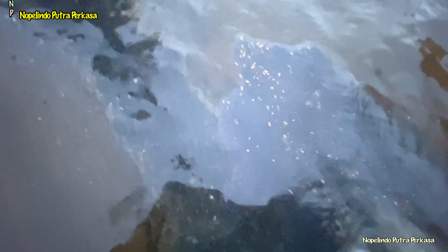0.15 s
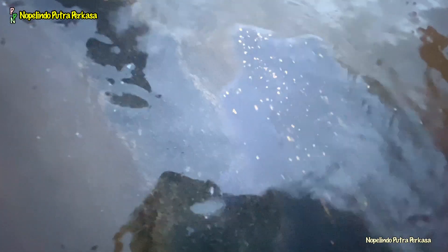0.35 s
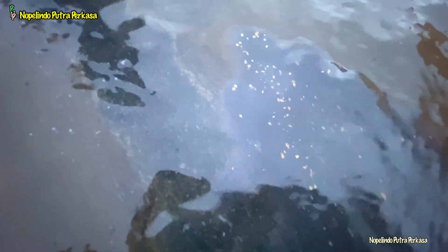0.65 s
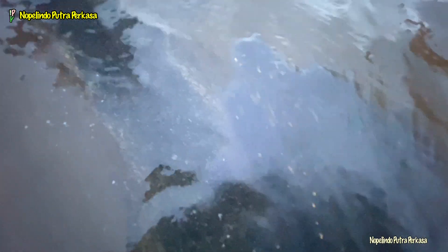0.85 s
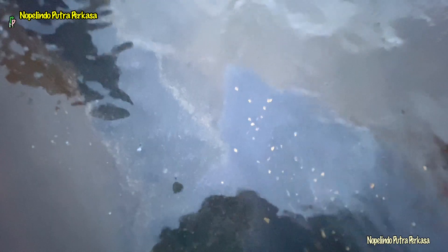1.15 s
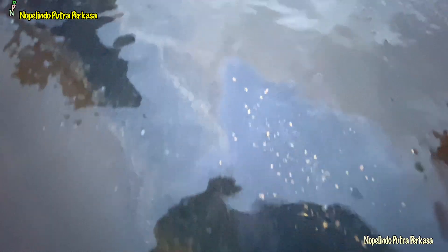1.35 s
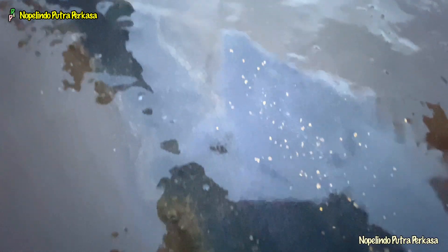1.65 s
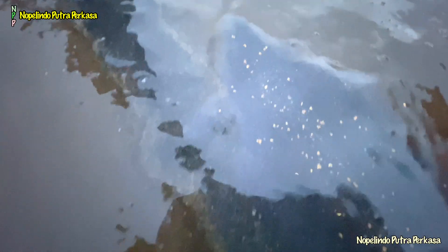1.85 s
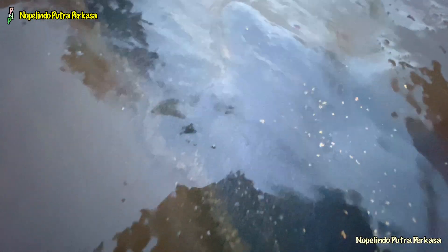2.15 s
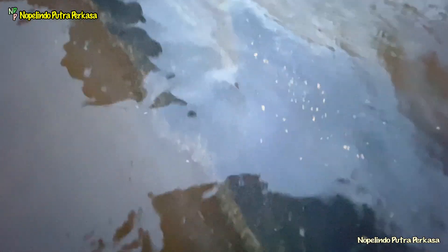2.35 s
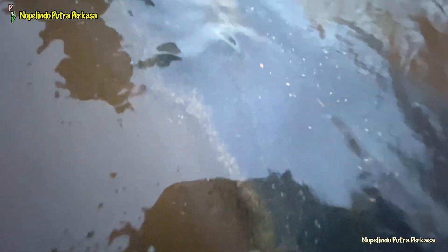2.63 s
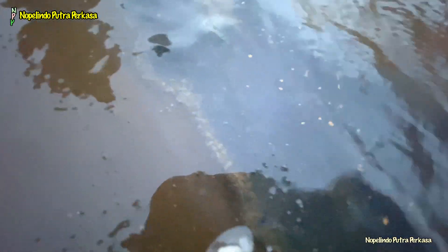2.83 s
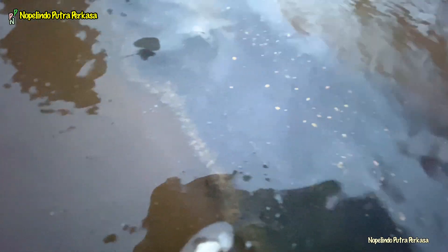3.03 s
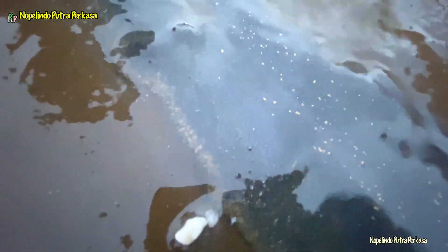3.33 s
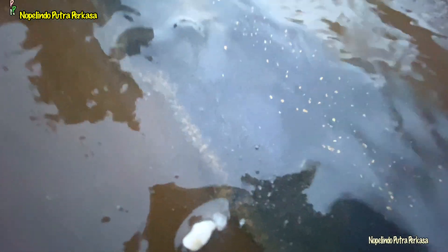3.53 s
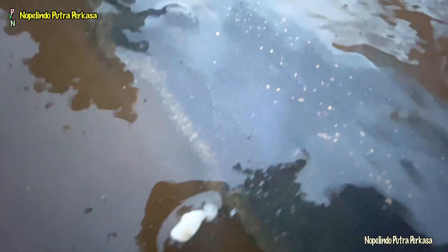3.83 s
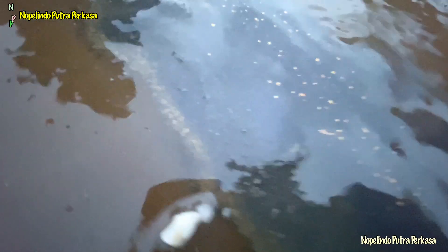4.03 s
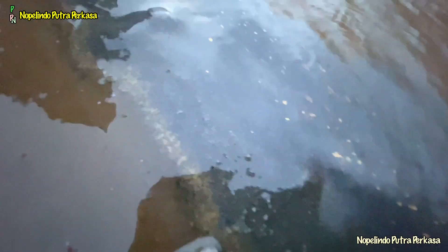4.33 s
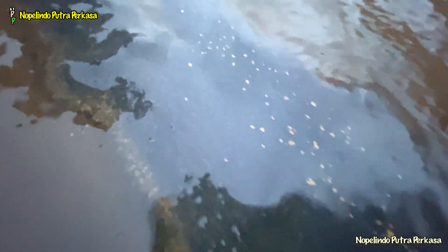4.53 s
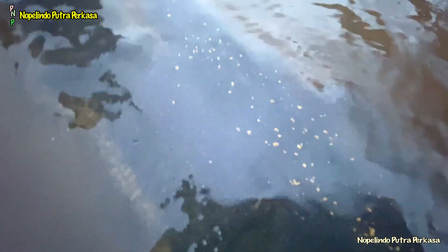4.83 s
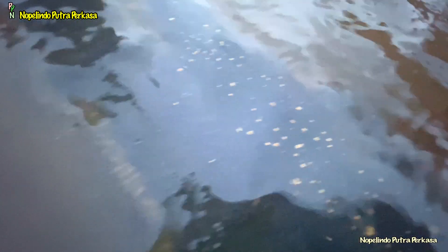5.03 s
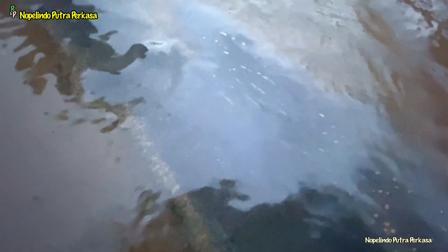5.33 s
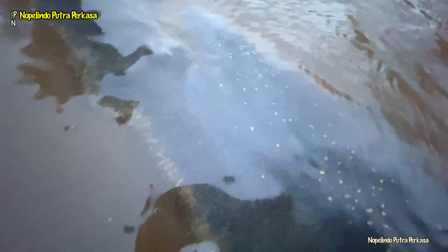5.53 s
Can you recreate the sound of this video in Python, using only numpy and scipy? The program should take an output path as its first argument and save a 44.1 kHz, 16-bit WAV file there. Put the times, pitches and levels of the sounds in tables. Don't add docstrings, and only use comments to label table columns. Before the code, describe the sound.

Quiet close sloshing, bubbles and tiny ticks in a pan of water give way to fast, deep, overloaded thumps on the pan.

```python
import sys
import numpy as np
from scipy import signal
from scipy.io import wavfile

SR = 44100
rng = np.random.default_rng(int(sys.argv[2]) if len(sys.argv) > 2 else 0)


def transcribe(u):
    v = np.clip(np.atleast_2d(u).T, -1, 1)
    q = np.round(v * 32767).astype(np.int16)
    wavfile.write(sys.argv[1], SR, q)


def volts_from_db(level):
    exponent = np.asarray(level, float) / 20
    return 10 ** exponent


N = 250047

# t/s, boom peak level/dB, then thud, wall and rim levels/dB relative to the boom
KNOCKS = [(3.151, -12.5, -21.5, -26.5, -30.5), (3.389, -3, -21.5, -27.5, -27),
          (3.573, -9, -16.5, -21.5, -24), (3.757, -7.5, -21.5, -18, -23.5),
          (3.9539, -1.13, -24.5, -35, -17.5), (4.193, -4, -17.5, -26, -16), (4.417, -1.26, -16, -26, -14),
          (4.653, -1.5, -18.5, -27, -22), (4.901, -3, -18.5, -25, -12), (4.965, -5.5, -23.5, -23, -8),
          (5.116, -20, -7, -11.5, -12), (5.155, -1, -21, -26.5, -16.5), (5.361, -33, -24, -47, -13),
          (5.437, -28, -11, -15.5, -15.5)]


def rms_one(x):
    return x / np.sqrt(np.mean(x ** 2) + 1e-20)


def at_hz(points, hz):
    table_hz, values = np.array(points).T
    return np.interp(np.log(hz), np.log(table_hz), values)


def sides(pan_db):
    return volts_from_db([[pan_db / 2], [-pan_db / 2]])


def add(out, s, sound):
    i = max(round(s * SR), 0)
    out[:, i:i + sound.shape[1]] += sound[:, :N - i]


def drift(rate):
    r = np.exp(-80 * np.pi * rate / SR)
    slow = signal.lfilter([1], [1, -2 * r, r * r], rng.standard_normal(N // 40 + 2002))[2000:]
    return np.interp(np.arange(N) / 40, np.arange(len(slow)), rms_one(slow))


def wash(spectrum, patchy_db, per_s, spread_db, grain_share, lag_ms, count=3):
    # f/Hz, likeness [-1 to 1]
    likeness = [(60, -0.82), (180, -0.42), (550, -0.15), (1650, -0.12), (4970, 0.79), (15000, -0.73)]
    heard = [hz for hz, db in spectrum if db > -60]
    low, high = heard[0], min(heard[-1], .45 * SR)
    bounds = np.geomspace(low, high, int(count * np.log2(high / low)) + 2)
    clumps = per_s * volts_from_db(5.6 * drift(18)) / SR
    share = np.clip(grain_share, 0, 1)
    white = rng.standard_normal((2, 2, N))
    grains = (rng.random((2, 1, N)) < clumps) * volts_from_db(spread_db * np.minimum(white ** 2, 8))
    white = np.sqrt(1 - share) * white + np.sqrt(share) * rms_one(grains * np.sign(white))
    out, together = 0, drift(19)
    for k, (a, b) in enumerate(zip(bounds, bounds[1:])):
        band = signal.butter(2, [a, b], "band", fs=SR, output="sos")
        mid, side = signal.sosfilt(band, white[k % 2])
        centre = np.sqrt(a * b)
        alike = np.clip(at_hz(likeness, centre), -1, 1)
        gain = volts_from_db(at_hz(spectrum, centre) + patchy_db * (0.91 * together + drift(4.4)))
        out = out + gain * (np.sqrt(1 + alike) * mid + np.sqrt(1 - alike) * side * [[1], [-1]])
    out[1] = np.roll(out[1], round(lag_ms * SR / 1000))
    return rms_one(out)


def hiss():
    white = rng.standard_normal((2, N))
    low = signal.butter(4, [900, 6500], "band", fs=SR, output="sos")
    high = signal.butter(3, [8000, 11000], "band", fs=SR, output="sos")
    low_hiss = rms_one(signal.sosfilt(low, white))
    high_hiss = rms_one(signal.sosfilt(high, white))
    return volts_from_db(-76) * low_hiss + volts_from_db(-93.5) * high_hiss


def breeze():
    # f/Hz, level/dB per Hz
    spectrum = [(15, -32.5), (25, 14), (86, -1.5), (182, -5.5), (227, -4), (400, -18), (520, -1.5),
                (880, -120)]
    # t/s, half width/s, level over the breeze/dB
    puffs = [
        (1.3, 0.16, 9.5),
        (1.501, .1, 2),
        (2.33, 0.038, 14),
        (2.72, 0.085, 11),
        (5.49, 0.098, 18),
        (5.63, 0.039, 5.5),
    ]
    air = wash(spectrum, patchy_db=0.5, per_s=9.1, spread_db=-1, grain_share=0.2, lag_ms=0, count=2)
    air = air * sides(-2.2)
    t = np.arange(N) / SR
    puffs_db = sum(db * np.exp(-((t - s) / half_s) ** 2) for s, half_s, db in puffs)
    rumble = signal.sosfilt(signal.butter(2, 150, fs=SR, output="sos"), air)
    return air + (volts_from_db(puffs_db) - 1) * rumble


def bird():
    # t/s, f/Hz, level/dB
    coos = [
        [(0.17, 430, -78), (0.212, 499.5, -76.5), (0.36, 533, -73)],
        [(0.39, 469, -74), (0.44, 435, -75), (0.47, 487, -73)],
        [(1.52, 447, -98), (1.534, 520, -64), (1.63, 526, -82)],
        [(1.65, 494, -69), (1.708, 543, -66.5), (1.74, 545, -81)],
        [(2.59, 592, -77), (2.63, 622, -62), (2.68, 820, -88)],
        [(1.76, 525, -73), (1.8, 498, -57), (1.84, 700, -73)],
    ]
    out, t = np.zeros(N), np.arange(N) / SR
    for call in coos:
        s, hz, db = np.transpose(call)
        gate = np.interp(t, [s[0] - .015, s[0], s[-1], s[-1] + 0.0089], [0, 1, 1, 0])
        waver_db = 2.5 * drift(62)
        level = gate * volts_from_db(np.interp(t, s, db) + 6 + waver_db)
        out += level * np.sin(2 * np.pi * np.cumsum(np.interp(t, s, hz)) / SR)
    return out


def flow():
    # level/dB of breeze, gurgle, trickle, fizz
    calm_db = [-59, -72.5, -79.5, -82]
    # t of crest/s, rise/s, fall/s, gurgle level/dB, thinness [0 deep - 1 shallow]
    surges = [(0.177, 0.38, 0.41, -70.5, 0.39), (0.532, .02, 0.028, -56, 0.31),
              (0.703, 0.08, 0.16, -75.5, 1), (1.125, 0.045, .2, -46, 0.21),
              (1.342, .05, 0.061, -61.5, 0.44), (1.451, 0.13, 0.17, -61.5, 0.82),
              (1.585, 0.2, 0.029, -58.5, 0.89), (1.644, 0.03, .19, -59.5, 0.63),
              (1.781, 0.21, 0.03, -72, 0.87), (2.32, 0.13, 0.34, -74, 0.79),
              (2.548, 0.023, 0.092, -73, 0.86), (2.698, 0.2, 0.049, -65.5, 0.04),
              (2.8, 0.041, 0.13, -85, 0.94), (3.03, 0.024, 0.24, -50, .35),
              (3.623, 0.36, 0.45, -70.5, 0.94), (4.333, 0.073, 0.19, -43.5, 0.17),
              (4.843, 0.061, 0.067, -55, 0.73), (4.999, 0.014, 0.11, -61.5, 1),
              (5.28, 0.088, 0.039, -49.5, 0.17)]
    deep_db, shallow_db = [-14, -31.5], [9, 1]
    rise_db, fall_db, edge_s = 10.5, 9, 0.036
    shake_db, shake_t60_s = np.c_[[-33.5, -36, -57.5, -70]], np.c_[[1, 0.73, 0.77, 0.63]]
    t = np.arange(N // 40 + 2) * 40 / SR
    power = volts_from_db(np.add.outer(calm_db, 0 * t)) ** 2
    for s, rise, fall, db, thin in surges:
        corners = np.cumsum([s - rise - edge_s, edge_s, rise, fall, edge_s])
        swell = np.interp(t, corners, [-60, -rise_db, 0, -fall_db, -60])
        upper_db = np.add(deep_db, thin * np.subtract(shallow_db, deep_db))
        power[1:] += volts_from_db(db + np.add.outer([0, *upper_db], swell)) ** 2
    for s, db, *_ in KNOCKS:
        age = np.maximum(t - s, 0) / shake_t60_s
        power += (t > s) * volts_from_db(db + shake_db - 60 * age) ** 2
    return [np.interp(np.arange(N) / SR, t, np.sqrt(p)) for p in power]


def gurgle():
    # f/Hz, level/dB per Hz
    spectrum = [(150, -65), (250, -18.5), (306, -10), (562, -9), (787, -10), (921, -8.5), (1040, -14.5),
                (1500, -20), (1950, -26.5), (3300, -120)]
    return wash(spectrum, patchy_db=3.5, per_s=200, spread_db=1.5, grain_share=.5, lag_ms=0.46)


def trickle():
    # f/Hz, level/dB per Hz
    spectrum = [(700, -35.5), (1000, -15.5), (1400, -9), (2000, -4), (2800, -11.5), (3700, -15),
                (4600, -7.5), (7000, -49)]
    return wash(spectrum, patchy_db=3.2, per_s=230, spread_db=1, grain_share=0.15, lag_ms=.5)


def fizz():
    # f/Hz, level/dB per Hz
    spectrum = [(2650, -16.5), (4500, 9.5), (5200, 2.5), (5700, 4.5), (6630, 13.5), (7360, -32.5),
                (7670, -63.5), (8030, 12), (8550, 18), (13000, -9), (15500, -31)]
    spray = wash(spectrum, patchy_db=3.5, per_s=500, spread_db=2.5, grain_share=0.52, lag_ms=.3, count=5)
    return spray * sides(-12)


def wisps():
    # t/s, length/s, start f/Hz, end f/Hz, level/dB
    films = [
        (0.475, 0.17, 3030, 3600, 8.5),
        (1.671, 0.12, 3410, 4060, 16),
        (2.431, 0.22, 3080, 3760, 4),
        (3.267, 0.076, 5950, 6000, 3),
        (4.071, 0.18, 3050, 3300, 12),
        (4.1, 0.12, 3800, 4100, 7),
    ]
    out, flutter, patches = np.zeros((2, N)), drift(130), drift(17)
    for s, length, start_hz, end_hz, db in films:
        t, i = np.linspace(0, 1, round(length * SR)), round(s * SR)
        span = slice(i, i + len(t))
        hz = start_hz + (end_hz - start_hz) * t + 150 * flutter[span]
        whistle = np.sin(np.pi * t) * np.sin(2 * np.pi * np.cumsum(hz) / SR)
        add(out, s, volts_from_db(db - 78 + 7 * patches[span]) * whistle * sides(0))
    return out


def splashes(low, high):
    # t/s, peak level/dB, low part relative level/dB, length/s
    heaps = [(0.527, -56, 1, 0.051), (1.429, -62.5, 16, 0.029), (1.625, -40, -3, 0.058),
             (2.305, -80, -15, 0.038), (2.57, -68, -9, 0.016), (2.692, -38, -23, 0.03),
             (3.42, -39.5, -13, 0.064), (4.183, -48.5, 22, 0.061), (4.472, -54, -4, 0.017),
             (4.74, -28.5, -28, 0.039), (4.933, -30.5, 12, 0.011), (5.031, -42, 24, 0.0075),
             (5.078, -70, 0, 0.061), (5.243, -34.5, 13.5, 0.024), (5.367, -43.5, -18, 0.014),
             (5.633, -47.5, -8, 0.033)]
    out = np.zeros((2, N))
    for s, db, low_db, length in heaps:
        i, t = round(s * SR), np.linspace(0, 1, max(round(2 * length * SR), 50))
        heap = volts_from_db(low_db + 4) * low[:, i:i + len(t)] + high[:, i:i + len(t)]
        swell = np.sin(np.pi * t ** 0.42) ** 2
        add(out, s - .003, volts_from_db(db - 16) * heap * swell[:heap.shape[1]])
    return out


def ticks():
    # t/s, peak level/dB, left-right level/dB
    droplets = [(0.127, -54, -20), (0.4358, -53, -21), (0.6383, -50, -37), (0.752, -50, -19),
                (1.047, -58, -22), (1.2346, -49.5, -15), (1.3034, -48, -14), (1.3437, -52, -7),
                (1.3618, -49.5, -1), (1.4585, -48, -29), (1.58, -53, -20), (1.694, -51, -26),
                (1.7497, -53, -38), (1.8576, -56.5, -29), (2.2173, -60, -31), (2.2635, -56.5, -36),
                (2.2846, -52, -28), (2.349, -51.5, -29), (2.395, -58, -19), (2.558, -52.5, -22),
                (2.605, -56.5, -24), (2.6782, -45, -10), (2.6996, -35.5, -13), (2.7316, -52, -33),
                (2.754, -48.5, -42), (2.773, -58, -30), (2.798, -50, -33), (2.8535, -49, -19),
                (2.8827, -52.5, -22), (2.9047, -53.5, -43), (2.978, -49, -38), (3.1355, -52, -25),
                (3.209, -56, -41), (3.3125, -58, -34), (3.3522, -53.5, -26), (3.489, -51.5, -12),
                (3.5156, -56, -30), (3.5364, -60, -24), (3.5937, -45.5, -10), (3.6415, -53, -25),
                (3.653, -50, -34), (3.6704, -53, -20), (3.6927, -49, -25), (3.731, -43.5, -19),
                (3.7434, -44, -16), (3.8012, -49, -4), (4.0871, -60, -22), (4.103, -59, -22),
                (4.464, -41, -9), (4.6345, -56, -31), (4.743, -44, -8), (4.763, -37, -25),
                (4.8748, -45, -15), (5.0499, -50, -15), (5.434, -49.5, -23), (5.6634, -48.5, -37)]
    # t/s, peak level/dB, left-right level/dB
    cracks = [(3.1517, -59, -2), (3.3886, -33.5, -20), (3.5721, -46, -12), (3.7593, -36.5, -6),
              (3.951, -57, -6), (3.9592, -44, -11.5), (4.1897, -36, -4), (4.212, -53, -22),
              (4.2594, -56.5, -19), (4.323, -66, -11), (4.4165, -34, -15), (4.6557, -39.5, -23),
              (4.6724, -43, -22), (4.7122, -48, -13), (4.901, -32, -5), (4.9235, -49, -4.5),
              (4.965, -28.5, -2), (4.985, -36.5, -1), (5.0245, -46, -4), (5.078, -49, -4),
              (5.119, -47.5, -7), (5.129, -49, -11.5), (5.1541, -27, -7), (5.24, -53, -9),
              (5.253, -64, -10)]
    # f/Hz, width/Hz, level/dB
    ports = [
        [(3600, 1200, -1), (6490, 1700, 4), (9500, 1400, -12.5), (11700, 4400, -31.5)],
        [(3500, 1500, -15.5), (5800, 1000, -14.5), (8350, 530, 8), (9200, 2600, -2)],
    ]
    clicks, t = np.zeros((2, N)) + 1e-18, np.arange(300) / SR
    strays = [(s * N / SR, -72 + 8 * size, -23) for s, size in rng.random((26, 2))]
    events = droplets + cracks + strays
    envelope = volts_from_db(-60 * t / 0.023) * np.minimum(t / .0005, 1)
    for (s, db, pan_db), crackle in zip(events, rng.standard_normal((len(events), len(t)))):
        add(clicks, s, volts_from_db(db + 4.5) * sides(.5 * pan_db) * crackle * envelope)
    out = volts_from_db(-39.5) * np.diff(clicks, prepend=0)
    for side, port in enumerate(ports):
        for k, (hz, width_hz, db) in enumerate(port):
            r = np.exp(-np.pi * width_hz / SR)
            poles = [1, -2 * r * np.cos(2 * np.pi * hz / SR), r * r]
            ringing = signal.lfilter([1, 0, -1], poles, clicks[side])
            out[side] += (-1) ** k * volts_from_db(db) * (1 - r * r) / 2 * ringing
    return out


def bubbles(events, cycles, rise, trim_db, lag_ms):
    out, turns = np.zeros((2, N)), rng.uniform(0, 2 * np.pi, (len(events), 1))
    for (s, db, hz, pan_db), turn in zip(events, turns):
        t = np.arange(round(1.5 * cycles / hz * SR + 60)) / SR
        t = np.maximum(t - [[0], [lag_ms / 1000]], 0)
        age = t * hz / cycles * np.log(1000)
        shape = np.e * age * np.exp(-age)
        tone = np.sin(2 * np.pi * hz * t * (1 + rise * age) + turn)
        add(out, s - .002, volts_from_db(db + trim_db) * sides(pan_db) * shape * tone)
    return out


def swarm(gain, low_hz, high_hz, spread_db, count):
    share, pitch, size, place = rng.random((count, 4)).T
    dragged = np.cumsum(gain ** .5)
    born = np.searchsorted(dragged, share * dragged[-1])
    level_db = 20 * np.log10(gain[born]) - spread_db * np.log(size + 0.023)
    hz = low_hz * (high_hz / low_hz) ** pitch
    return np.transpose([born / SR, level_db, hz, 12 * (place - .5)])


def small_bubbles(trickle_gain):
    events = swarm(trickle_gain, low_hz=702, high_hz=3000, spread_db=3.5, count=700)
    return bubbles(events, cycles=20, rise=0.012, trim_db=-7, lag_ms=0.39)


def mist(fizz_gain):
    events = swarm(fizz_gain, low_hz=3200, high_hz=6500, spread_db=4.5, count=300)
    return bubbles(events, cycles=22, rise=0.01, trim_db=-4, lag_ms=0.4)


def beads():
    # t/s, peak level/dB, f/Hz, left-right level/dB
    events = [(0.471, -59, 5870, -0.5), (0.4895, -37.5, 5210, -4), (0.7517, -47.5, 5470, 2),
              (1.8027, -49, 4160, -2.5), (2.3949, -55, 5840, -2.0), (2.6817, -51, 3500, -14),
              (2.7012, -35, 3070, -2), (2.7556, -44, 6650, -6), (2.9795, -50, 6640, -1.0),
              (3.057, -53, 5750, -0.5), (3.136, -47.5, 5560, 1), (3.3129, -55, 6100, -2),
              (3.353, -50, 5630, 1), (3.414, -41.5, 3430, -1), (3.4553, -45, 6000, 2),
              (3.573, -38, 4640, 1), (3.7303, -56, 6160, -5), (3.7426, -46, 6430, 1),
              (3.7567, -36, 4700, -4), (3.8022, -49.5, 4340, -4), (3.9538, -34, 4340, -7.5),
              (4.1909, -37.5, 4130, -3), (4.464, -44, 6400, -3), (4.6537, -35.5, 4160, 2),
              (4.744, -37.5, 4180, -4), (4.761, -37, 3650, -1), (4.817, -47, 3640, 0),
              (4.901, -33, 2600, -1), (4.8548, -44, 3300, 2), (4.8744, -44, 5970, -0.5),
              (4.965, -37, 3170, -22), (4.9784, -20.5, 5380, -3), (4.9874, -42, 5500, -0.5),
              (4.9974, -36, 5600, 0), (5.0144, -47, 5500, -1), (5.077, -43, 5650, -1),
              (5.2055, -41.5, 2860, -3.5), (5.652, -45, 5920, 0)]
    return bubbles(events, cycles=24.5, rise=0.0028, trim_db=-1.5, lag_ms=0.488)


def more_drips():
    # t/s, peak level/dB, f/Hz, left-right level/dB
    events = [(1.1278, -44, 1840, 0), (1.1524, -46, 1460, -2), (1.2044, -49, 2540, 0),
              (1.2866, -40.5, 1980, -1), (1.4444, -60, 1830, -1), (1.5046, -46.5, 1580, -1),
              (1.561, -46, 2050, -1), (1.5744, -48, 1440, -.5), (1.5893, -45, 1360, -1),
              (1.696, -39, 3580, 1), (1.736, -41, 3600, -2), (1.746, -44, 1990, -7),
              (3.054, -39, 2250, 8.5), (3.066, -42, 1930, -3), (3.124, -45, 1770, -1),
              (3.178, -45.5, 2150, -14), (3.2024, -51, 2660, -3), (3.3034, -51, 2130, 6),
              (3.3594, -53, 1960, 1), (4.1678, -47, 1390, 1), (4.2254, -34, 1910, -2),
              (4.9304, -36, 1820, -3), (5.0295, -45, 2020, -7)]
    return bubbles(events, cycles=26, rise=0.0079, trim_db=-4, lag_ms=0.653)


def drips():
    # t/s, peak level/dB, f/Hz, left-right level/dB
    events = [(0.7194, -36, 2550, -2), (1.2781, -46.5, 2280, 11), (1.4172, -44.5, 1740, 5.5),
              (1.431, -44, 2780, -2), (1.5588, -46.5, 1335, -0.5), (1.633, -45.5, 1226, -2),
              (1.6706, -32, 2530, -0.5), (1.6965, -47, 1350, 1), (1.7474, -52, 1480, -1.5),
              (2.3526, -40, 2690, -1), (2.6065, -42.5, 2540, -7), (3.029, -39.5, 2070, 1.5),
              (3.0986, -47, 2070, 1), (3.244, -46, 1410, 0.5), (3.3393, -51, 1860, 1),
              (3.414, -58, 1290, 3), (3.474, -40, 1300, -3), (3.5364, -42, 2640, -2),
              (4.752, -36, 3640, -9), (5.094, -60, 1690, -3)]
    return bubbles(events, cycles=25.6, rise=0.007, trim_db=-1, lag_ms=0.579)


def plops():
    # t/s, peak level/dB, f/Hz, left-right level/dB
    events = [(0.258, -43.5, 544, 1), (0.534, -59, 480, -11), (0.761, -60, 615, 25.5),
              (1.112, -58, 670, -4), (1.152, -26, 632, 0), (1.204, -28.5, 546, 4), (1.228, -28.5, 563, 3),
              (1.258, -32, 580, -1), (1.644, -37, 1140, -2), (2.674, -51.5, 895, 29), (2.7, -39, 887, -17),
              (3.026, -35, 468, 0), (3.042, -24.5, 576, -2), (3.008, -38, 940, -2), (3.038, -37, 950, 3),
              (3.069, -33.5, 480, 1), (3.071, -24, 920, 2.5), (3.456, -32, 500, 5), (4.114, -43, 810, 10),
              (4.33, -22.5, 605, 1), (5.028, -40, 940, -10), (5.616, -45.5, 833, 17)]
    return bubbles(events, cycles=17.8, rise=0.0023, trim_db=-6, lag_ms=0.6)


def modes(table, scatter, travel, swell, tail_db, tail_times, wander, bend, loose):
    t, out = np.arange(round(.22 * SR)) / SR, 0
    for (hz, db, t60, pan_db, lead), (strength, detune, turn, turn_left) in zip(table, scatter):
        age = np.maximum(t - travel / np.sqrt(hz), 0)
        fade = volts_from_db(-60 * (age / t60) ** bend) + volts_from_db(tail_db - 60 * age / (tail_times * t60))
        shape = (1 - np.exp(-(age * hz / swell) ** 2)) * fade
        sag = .25 * (1 - np.exp(-age * hz))
        phase = 2 * np.pi * (hz * (1 + wander * detune) * age + sag)
        phase = phase + loose * turn + [[lead + loose * turn_left], [0]]
        out = out + volts_from_db(db + 1.3 * strength) * sides(pan_db) * shape * np.sin(phase)
    return out


def knocks(skin):
    # f/Hz, level/dB, ring t60/s, left-right level/dB, left lead/rad
    pan_modes = [(75.44, 1.5, 0.047, -19.5, 2.5), (85.5, 3.5, 0.036, -6, 0.64),
                 (180.06, -3, 0.065, -12, 0.68), (252.6, -12, 0.056, -4, 1.02)]
    wall_modes = [(304, 8, 0.048, 0.67, 4), (406.8, 11, 0.037, -2, 1), (471, -0.5, 0.053, 0.1, 0.3),
                  (574, 5.5, 0.054, 0.93, -1.7)]
    rim_modes = [(722, -5.5, 0.069, 0.02, -2), (820, -8, 0.071, 0.013, -1.3), (940, 3.5, 0.052, 0.01, 1.93),
                 (1129, -8.5, 0.033, 0.01, 0.3), (1300, -13.5, 0.041, 0.01, 2.1),
                 (1694, -13, 0.009, 0.02, 0.5)]
    # upper wall mode level/dB, slap level/dB, thud pitch ratio (a resting hand stiffens)
    spots = [(-4, 4, 1.05), (-13.5, 1, 1.06), (-18, -5.5, 0.99), (-5.5, 0.1, 0.93), (8, -2.5, 0.945),
             (-4, -0.5, 1.02), (0.5, -4.5, 0.983), (2, 3.5, 1.022), (0.5, -1.5, 1.03), (-14, -3, 1.27),
             (1.5, -6, 0.72), (-0.5, 3, 1.066), (-1, 1, 1.1), (3.5, -29, 1.65)]
    approach_s, approach_db = 0.014, -20
    rebound_s, rebound_db = 0.025, -11.5
    out, count = np.zeros((2, N)), len(KNOCKS)
    scatter = rng.standard_normal((count, len(pan_modes + wall_modes + rim_modes), 4))
    t = np.arange(round(.2 * SR)) / SR
    rattles = rng.standard_normal((count, len(t))) * volts_from_db(-24 - 60 * t / 0.056)
    rattles[:, 0] = 1
    rattles[:, round(rebound_s * SR)] += volts_from_db(rebound_db + 0.87 * rng.standard_normal(count))

    contact = (1 - np.exp(-(t / 0.0014) ** 2)) * (volts_from_db(-60 * t / 0.042) + volts_from_db(-23 - 60 * t / 0.21))
    brush = np.linspace(0, 1, round(approach_s * SR)) ** 2 * volts_from_db(approach_db)
    contact = np.maximum(contact, brush[-1] * (t < .002))
    envelope = np.concatenate([brush, contact])[:len(t)]

    for knock, spot, chance, rattle in zip(KNOCKS, spots, scatter, rattles):
        s, db, thud_db, wall_db, rim_db = knock
        upper_db, slap_db, ratio = spot
        stiff = [(hz * ratio, *rest) for hz, *rest in pan_modes[:2]]
        struck = wall_modes[:-1] + [np.add(wall_modes[-1], [0, upper_db, 0, 0, 0])]
        thud = modes(stiff, chance[:2], travel=0.092, swell=0.77, tail_db=-25.5, tail_times=4.46,
                     wander=.025, bend=1.45, loose=.2)
        boom = modes(pan_modes[2:], chance[2:4], travel=0.085, swell=0.51, tail_db=-10, tail_times=3.3,
                     wander=0.026, bend=1.11, loose=.2)
        wall = modes(struck, chance[4:8], travel=.07, swell=1.4, tail_db=-60, tail_times=1,
                     wander=.025, bend=1, loose=.3)
        rim = modes(rim_modes, chance[8:], travel=.07, swell=2.5, tail_db=-60, tail_times=1,
                    wander=.03, bend=1, loose=.3)
        upper = volts_from_db(wall_db + 10.5) * wall + volts_from_db(rim_db + 2.5) * rim
        upper = signal.fftconvolve(upper, rattle[None], axes=1)[:, :upper.shape[1]]
        add(out, s - .004, volts_from_db(db) * (volts_from_db(thud_db + 15) * thud + volts_from_db(0.5) * boom + upper))

        i = round(s * SR)
        slap_gain = volts_from_db(db - 12 + 0.97 * rim_db + slap_db)
        add(out, s - .003 - approach_s, slap_gain * skin[:, i:i + len(t)] * envelope)
    return out


def scene():
    breeze_gain, gurgle_gain, trickle_gain, fizz_gain = flow()
    deep, thin, fine = gurgle(), trickle(), fizz()
    background = hiss() + breeze_gain * breeze() + bird()
    water = gurgle_gain * deep + volts_from_db(-5) * trickle_gain * thin + fizz_gain * fine
    spray = np.roll(thin + volts_from_db(-13) * fine, N // 3, axis=1)
    thrown = wisps() + splashes(np.roll(deep, N // 3, axis=1), spray) + ticks()
    swarms = small_bubbles(trickle_gain) + mist(fizz_gain)
    single_bubbles = beads() + more_drips() + drips() + plops()
    return background + water + thrown + swarms + single_bubbles + knocks(spray)


def low_pass(x):
    return signal.sosfilt(signal.butter(12, 16460, fs=SR, output="sos"), x)


def record(dry):
    cut = signal.sosfilt(signal.butter(4, 50, "high", fs=SR, output="sos"), dry)
    notch = signal.butter(1, [6900, 7800], "band", fs=SR, output="sos")
    cut = cut - .7 * signal.sosfilt(notch, cut)
    loaded = cut / (1 + np.abs(cut) ** 6) ** (1 / 6)
    top_cut = signal.cheby2(10, 60, 16700, fs=SR, output="sos")
    mix = signal.sosfilt(top_cut, loaded)
    return low_pass(mix)


dry = scene()
out = record(dry)
transcribe(out)
```